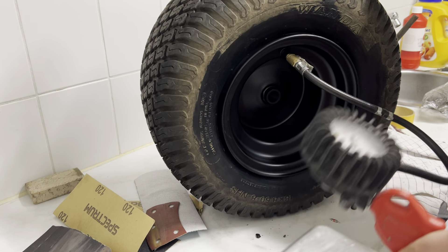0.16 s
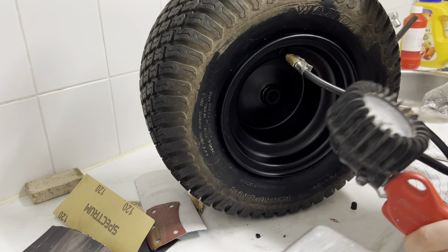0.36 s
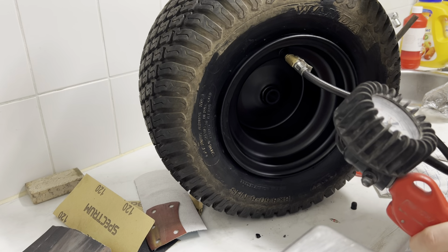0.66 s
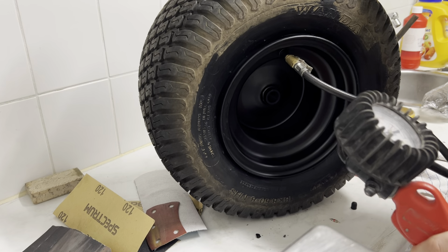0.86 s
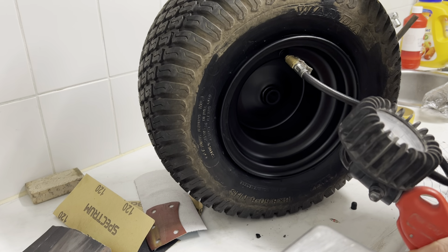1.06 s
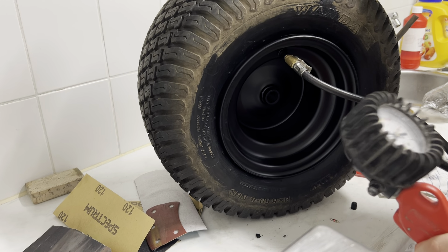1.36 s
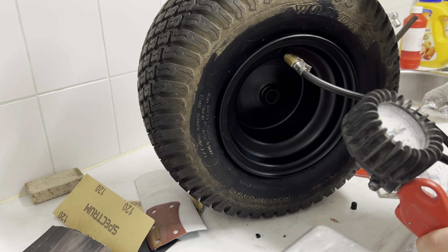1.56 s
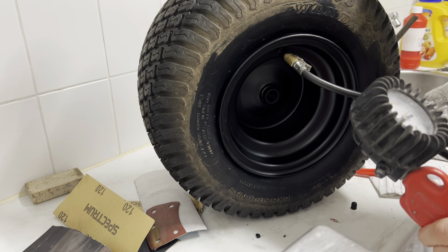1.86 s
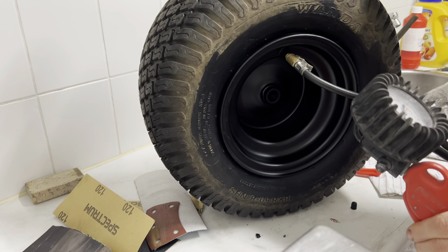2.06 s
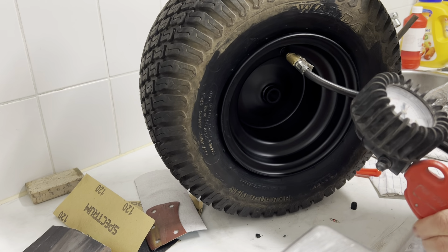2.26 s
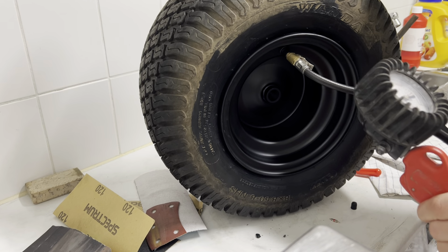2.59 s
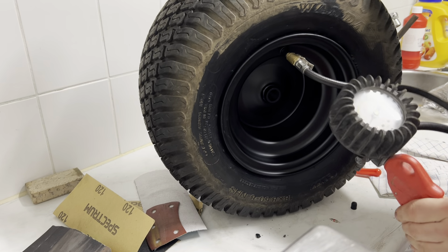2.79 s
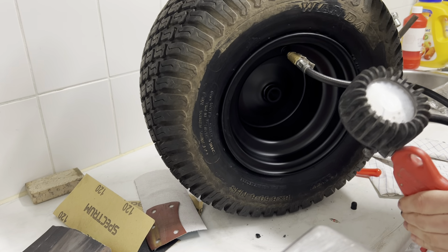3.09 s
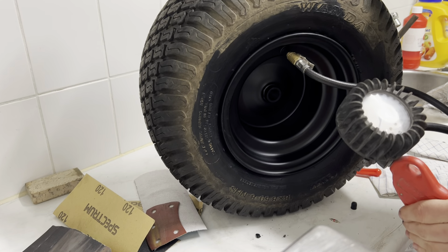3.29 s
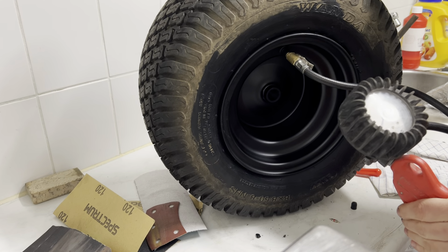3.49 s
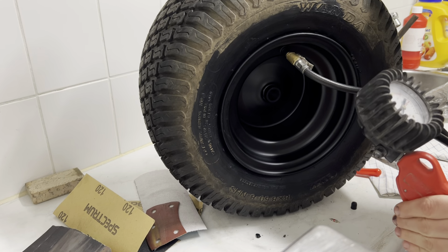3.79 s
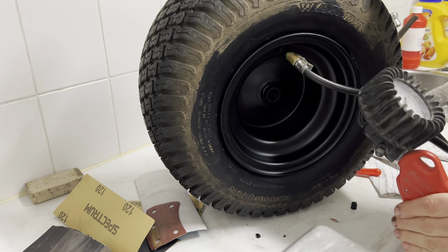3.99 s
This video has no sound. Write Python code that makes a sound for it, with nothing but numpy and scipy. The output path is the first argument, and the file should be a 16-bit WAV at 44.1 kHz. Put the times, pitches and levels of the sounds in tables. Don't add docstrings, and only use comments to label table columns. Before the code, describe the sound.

A small compressor runs throughout in a hard tiled room: a low, steady, buzzing drone near 58 Hz with strong harmonics, mains hum, slow beating, broadband fan roar and thin, unsteady motor whines. It starts subdued, swells from about 0.4 s to its fullest at 2.1 s, stays near that and eases after 3.5 s. Over it, faint high air hiss with narrow whistles around 9 to 14 kHz marks three inflator squeezes: 0.2-0.6 s, 1.2-1.9 s and a softer 2.2-2.7 s. A light dull tap falls at 0.6 s. At 2.73 s the gauge knocks the bench hard, a sharp crack and woody thud with short wall reflections, a tiny bounce at 2.78 s and a brief rattle. The drone ducks, then recovers, as a short rush of released air passes and a high whine near 5 kHz swells to 3.2 s and fades. Stereo phone pickup, slight hiss.

```python
import sys
import numpy as np
from scipy import signal
from scipy.fft import rfft, irfft
from scipy.io import wavfile
from scipy.ndimage import uniform_filter1d

SR = 44100
rng = np.random.default_rng(int(sys.argv[2]) if len(sys.argv) > 2 else 0)


def to_linear_factor(level_db):
    exponent = np.asarray(level_db, float) / 20
    return 10 ** exponent


def unload_wav(signal):
    wavfile.write(
        sys.argv[1],
        SR,
        np.round(np.clip(np.atleast_2d(signal).T, -1, 1) * 32767).astype(np.int16),
    )


N = 182641
TIME = np.arange(N) / SR
KNOCK_TIME = np.arange(12000) / SR
HUM_HZ = 100.1
START_TURN, TANK_TURN = .445, .58
PORT_HZ, PORT_S = 8450, .000279


def evened(x):
    return x / np.sqrt(np.mean(x ** 2) + 1e-20)


def read(points, hz):
    f, value = np.transpose(points)
    return np.interp(np.log(hz + 1), np.log(f + 1), value)


def bump(peak_s, rise_s, fall_s):
    width_s = np.where(TIME < peak_s, rise_s, fall_s)
    return np.exp(-((TIME - peak_s) / width_s) ** 2)


def loudness_db():
    # time_s, level_db
    swell = [
        (0, -29),
        (.4, -28.5),
        (1.2, -24.5),
        (1.8, -21),
        (2.1, -18),
        (3.55, -19),
        (4.15, -23),
    ]
    return np.interp(TIME, *np.transpose(swell))


def nearness():
    far_db, near_db = -30, -17.5
    return np.clip((loudness_db() - far_db) / (near_db - far_db), 0, 1)


def tone(turns, db, pan_db, lead_rad=0):
    angle = 2 * np.pi * turns
    return np.sqrt(2) * to_linear_factor(db) * np.array([np.cos(angle), to_linear_factor(-pan_db) * np.cos(angle - lead_rad)])


def fuzz(width_hz):
    r = np.exp(-np.pi * width_hz / SR)
    white = rng.standard_normal(N) + 1j * rng.standard_normal(N)
    z = signal.lfilter([1], [1, -2 * r, r * r], white)
    return z / np.sqrt(np.mean(abs(z) ** 2))


def left_lead(hz):
    # freq_hz, lead_rad
    lead = [(500, 0.13), (2000, 0), (3000, 2), (6500, -0.5), (7400, -3.5)]
    delayed = 2 * np.pi * (PORT_HZ - hz) * PORT_S * (1 - 0.14 * (hz < PORT_HZ))
    return np.where(hz > 7400, delayed, read(lead, hz))


def ports(colour_db, patchy_db):
    # freq_hz, likeness_0_1
    likeness = [(100, 1), (400, 0.5), (700, 0.038), (2500, 0.17), (6800, 0.96), (7600, 0.43), (8300, 1),
                (16000, 0.72)]
    frames, hz = N // 256 + 5, np.fft.rfftfreq(1024, 1 / SR)
    a, b, c, d, patches = rng.standard_normal((frames, 513, 5)).T
    for axis in (0, 1):
        patches = uniform_filter1d(patches, size=10, axis=axis)
    patches = evened(patches)
    same = np.clip(read(likeness, hz), 0, 1)[:, None]
    left, loose = a + 1j * b, c + 1j * d
    right = same * left + np.sqrt(1 - same ** 2) * loose
    right = right * np.exp(-1j * left_lead(hz))[:, None]
    z = np.array([left, right]) * to_linear_factor(colour_db(hz)[..., None] + patchy_db * patches)
    return evened(signal.istft(z, nperseg=1024, noverlap=768)[1][:, :N])


def casing_air(shaft):
    # freq_hz, level_db_per_hz
    left_air = [(45, -5), (85, -12), (140, -17), (260, 4), (420, 2.5), (700, -5.5), (1200, 1.5),
                (1950, -10.5), (2400, -6.5), (2900, -13), (4000, -14), (6500, -18.5), (8000, -23),
                (15000, -32)]
    right_air = [(45, -10), (85, -4), (140, -14), (260, -2), (420, 1.5), (700, 3.5), (1200, -1.5),
                 (1950, -10.5), (2400, -12), (2900, -18.5), (4000, -22), (6500, -33.5), (8000, -20.5),
                 (15000, -33.5)]
    roar = ports(lambda hz: np.array([read(left_air, hz), read(right_air, hz)]), patchy_db=0.9)
    pump = 1 + 0.019 * np.cos(2 * np.pi * shaft) + 0.016 * np.cos(2 * 2 * np.pi * shaft)
    far_db, near_db = -1, 0.96
    flow_db = far_db + (near_db - far_db) * nearness()
    puff_db = 2.5 * bump(2.79, 0.13, 0.13)
    return to_linear_factor(-11.5 + flow_db + puff_db) * pump * roar


def rotor(shaft):
    # shaft_order, hum_multiple, far_db, near_db, left_right_db
    whines = [(50, 5, -35, -30, 7), (50, 6, -35, -32, 7), (51, 5, -42, -39, 7), (50, 3, -44, -41, 7),
              (56.8, 0, -44, -41, 7), (41.4, 0, -40, -37, 6), (26.8, 0, -38, -35, 2),
              (19.9, 0, -33, -29, 3), (30, 0, -41, -37, 2), (46.2, 0, -43, -40, 5), (49.1, 0, -45, -43, 5),
              (57.9, 0, -42, -42, 7), (82.2, 0, -46, -46, 10), (117, 0, -45, -45, 8),
              (197.6, 0, -52, -50, 0)]
    # shaft_order, level_db
    slot_orders = [(88.03, 1), (86.97, -10), (88.97, -10), (84.05, -11), (92.8, -12)]
    near, out = nearness(), np.zeros((2, N))
    slot_db = -37.5 + 9.5 * bump(3.22, .46, .45)
    lines = [(k, m, far_db + near * (near_db - far_db), pan_db) for k, m, far_db, near_db, pan_db in whines]
    lines += [(k, 0, slot_db + db, 12) for k, db in slot_orders]
    for k, m, db, pan_db in lines:
        shake = .9 + .12 * fuzz(12) + .3 * fuzz(80)
        turns = k * shaft + m * HUM_HZ * TIME
        wave = (shake * np.exp(2j * np.pi * turns)).real
        out += to_linear_factor(db) * wave * np.sqrt(2) * to_linear_factor([[0], [-pan_db]])
    return to_linear_factor(2.1) * out


def fan_tones(shaft):
    # order_above, level_db, left_right_db, beat_offset_turns
    fan_lines = [(5, -12, 2, .7), (6, -13.5, 2, .27), (7, -24, 6, .92), (11, -26, -2, .9),
                 (12, -21, 9, .5)]
    near, out = nearness(), np.zeros((2, N))
    fan = .1145 * (shaft - START_TURN)
    for k, db, pan_db, offset in fan_lines:
        out += tone(k * shaft - fan + TANK_TURN + offset, db - 5.6 * (1 - near), pan_db)
    return out


def hum_mixes(shaft):
    # shaft_order, hum_multiple, level_db, left_right_db
    mixed = [(2, 1, -23, 0), (3, 1, -16.5, 3), (4, 1, -22, -2), (5, 1, -17, 3), (7, 1, -28, -2),
             (0, 2, -29, -1), (5, -1, -28, -2), (6, -1, -28, -1), (7, -1, -26, 4), (8, -1, -23, 4),
             (9, -1, -26, 4)]
    out = np.zeros((2, N))
    for k, m, db, pan_db in mixed:
        out += tone(k * shaft + m * HUM_HZ * TIME + rng.random(), db + 0.029, pan_db)
    return out


def shaft_orders(shaft):
    # shaft_order, far_db, near_db, left_right_db, left_lead_rad
    orders = [(1, -17.5, -16.5, 1, -0.4), (2, -10.5, -4, 2.5, -0.0), (3, -16, -16, -6, -0.4),
              (4, -6, -11.5, 0.5, -0.96), (5, -4, -3, 4.5, 0.26), (6, -5, -7.5, 3.5, -0.5),
              (7, -15, -24.5, 1, -2), (8, -31.5, -25.5, -4.5, 0.83), (9, -31.5, -11, 4.5, -0.35),
              (10, -21, -20.5, -1, 1.5), (11, -26, -24, -1.5, -1.4), (12, -32, -43, 2, -0.2),
              (13, -30, -28, 6, 1), (14, -27, -20, 7, -10.5), (15, -40, -19.5, -3, 3),
              (16, -26, -28.5, -9, 1.04), (17, -33, -65, 7, -4.5), (18, -23.5, -22, 9.5, -0.1),
              (19, -31, -44, 14, 0.8), (20, -33, -23.5, -1, -2), (21, -32, -36.5, 2, -1.8),
              (22, -22.5, -63, -3, -0.7), (23, -41, -52, -3, 1), (24, -35, -40, 4, -1)]
    near, out = nearness(), np.zeros((2, N))
    for k, far_db, near_db, pan_db, lead_rad in orders:
        wobble = 1 + 0.0076 * k * fuzz(20).real
        turns = k * shaft + TANK_TURN * (k > 2) + rng.random() * (k > 7)
        closeness = np.minimum(near * (1 + 1.1 * (k > 9)), 1)
        out += wobble * tone(turns, far_db + closeness * (near_db - far_db), pan_db, lead_rad)
    return out


def inflator():
    # start_s, end_s, level_db
    squeezes = [
        (0.2, .6, 5.5),
        (1.214, 1.9, 5),
        (2.2, 2.717, 3),
    ]
    # freq_hz, width_hz, first_db, second_db, third_db
    whistles = [(9000, 80, -42, -50, -50), (9180, 60, -40, -49, -49), (9920, 50, -46, -45, -46),
                (10620, 60, -47, -43, -46), (14120, 70, -51, -46, -50)]
    gates = []
    for start_s, end_s, db in squeezes:
        ramp = np.minimum((TIME - start_s) / 0.01, (end_s - TIME) / 0.03)
        gates.append(to_linear_factor(db) * np.clip(ramp, 0, 1))
    jet = to_linear_factor(-38) * ports(lambda hz: -8 * np.log2((hz + 1) / 11000) ** 2, patchy_db=1.5)
    out = jet * sum(gates)
    for hz, width_hz, *dbs in whistles:
        level = sum(to_linear_factor(db) * gate for db, gate in zip(dbs, gates))
        wave = fuzz(width_hz) * np.exp(2j * np.pi * hz * TIME) * level
        delayed = wave * np.exp(2j * np.pi * (hz - PORT_HZ) * PORT_S)
        out += np.sqrt(2) * np.array([wave, delayed]).real
    return out


def bench_thud(thud_db, tilt_db):
    # freq_hz, level_db, t60_s
    modes = [(61.5, -8, 0.18), (123.8, -1.5, 0.15), (152.4, 1.5, 0.14), (233, -2, 0.065), (345, -9, 0.59),
             (438, -2, 0.11), (528, -9, 0.059), (792, -4, 0.026), (1250, -11, 0.027), (1540, -14, 0.03),
             (1980, -14, 0.014), (2900, -16, 0.011), (4170, -21, 0.0077), (8070, -27, 0.0073)]
    t, hit = KNOCK_TIME, np.zeros(len(KNOCK_TIME))
    for hz, db, t60_s in modes:
        level_db = db + thud_db + tilt_db * np.log2(hz / 150)
        hit += to_linear_factor(level_db - 60 * t / t60_s) * np.sin(2 * np.pi * hz * t) * np.minimum(t * hz, 1)
    return hit


def rattle(db):
    t = KNOCK_TIME
    lowpass = signal.butter(2, 560, fs=SR, output="sos")
    rumble = evened(signal.sosfilt(lowpass, rng.standard_normal(len(t))))
    return rumble * to_linear_factor(db - 10 - 60 * t / .33) * np.minimum(t / 0.011, 1)


def first_dent(added_db):
    # freq_hz, level_db, t60_s, delay_s
    dent = (305, 11.5, .03, .0012)
    hz, db, t60_s, delay_s = dent
    t = KNOCK_TIME
    blow = to_linear_factor(db + added_db - 60 * t / t60_s) * np.sin(2 * np.pi * hz * t)
    return np.roll(blow, round(delay_s * SR)) * to_linear_factor([[-8], [-10.5]])


def tip_crack(crack_db):
    t = KNOCK_TIME
    crack = signal.lfilter([1, -1], np.poly([.95, .75, .7, -.5]), rng.standard_normal(len(t)))
    tick = to_linear_factor(19) * np.diff(rng.standard_normal(len(t) + 2), 2) * np.exp(-t / .0012)
    left = np.roll(crack * np.exp(-t / .0009) + tick / 10, 20)
    turn = np.exp(-1j * left_lead(np.fft.rfftfreq(len(t), 1 / SR)))
    right = irfft(rfft(left) * turn, len(t))
    return to_linear_factor(crack_db) * np.array([left, right]) * (t < .02)


def knock(start_s, thud_db, tilt_db, crack_db):
    hit = bench_thud(thud_db, tilt_db) + rattle(thud_db + tilt_db)
    blow = first_dent(thud_db + tilt_db)
    pair = np.array([hit, to_linear_factor(2.0) * hit]) * 0.41 + tip_crack(crack_db) - blow
    for delay_s, left, right in ((.0075, 0.36, 0.035), (.0145, 0.27, 0.059), (.031, .06, .08)):
        pair += np.roll(hit, round(delay_s * SR)) * np.array([[left], [right]])
    for delay_s, gain in ((.0132, .75), (.031, .3)):
        pair -= gain * np.roll(blow, round(delay_s * SR), axis=1)
    first, length = round(start_s * SR), len(hit)
    out = np.zeros((2, N + length))
    out[:, first:first + length] = pair
    return out[:, :N]


def scene():
    # start_s, thud_db, tilt_db_per_octave (negative is duller), crack_db
    knocks = [
        (0.617, -15.5, -7, -70),
        (2.726, -1.5, 2, -32),
        (2.78, -25, 1, -70),
    ]
    sag_hz = .72 * np.exp(-np.maximum(TIME - .4, 0) / .4)
    shaft = START_TURN + np.cumsum(58.0 - sag_hz) / SR
    steady = casing_air(shaft) + rotor(shaft) + fan_tones(shaft)
    steady = steady + hum_mixes(shaft) + shaft_orders(shaft) + inflator()
    return to_linear_factor(loudness_db()) * steady + sum(knock(*row) for row in knocks)


def band_limit(x):
    return signal.sosfilt(signal.butter(12, 17080, fs=SR, output="sos"), x)


def record(dry):
    power_db = 10 * np.log10(abs(uniform_filter1d((dry ** 2).mean(0), size=600)) + 1e-12)
    fall_db = TIME * 30.
    held_db = np.maximum.accumulate(power_db + fall_db) - fall_db
    over_db = np.maximum(held_db + 16, 0)
    ducked = dry / to_linear_factor(.5 * uniform_filter1d(over_db, size=900, origin=440))
    hissy = ducked + to_linear_factor(-70) * rng.standard_normal(dry.shape)
    overloaded = np.tanh(hissy * .5) / .5
    bass_cut = signal.butter(2, 38, "high", fs=SR, output="sos")
    mix = signal.sosfiltfilt(bass_cut, overloaded, padtype="even", padlen=8000)
    band = signal.firwin(511, 15780, window=("kaiser", 9), fs=SR)
    mix = signal.oaconvolve(mix, band[None], "same")
    return band_limit(mix)


dry = scene()
out = record(dry)
unload_wav(out)
```